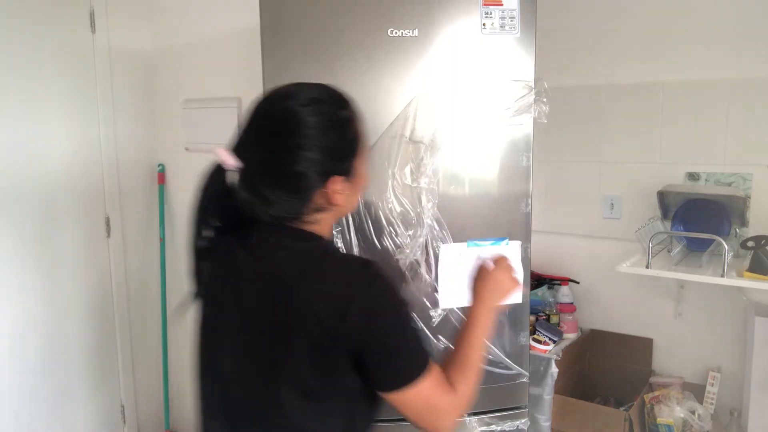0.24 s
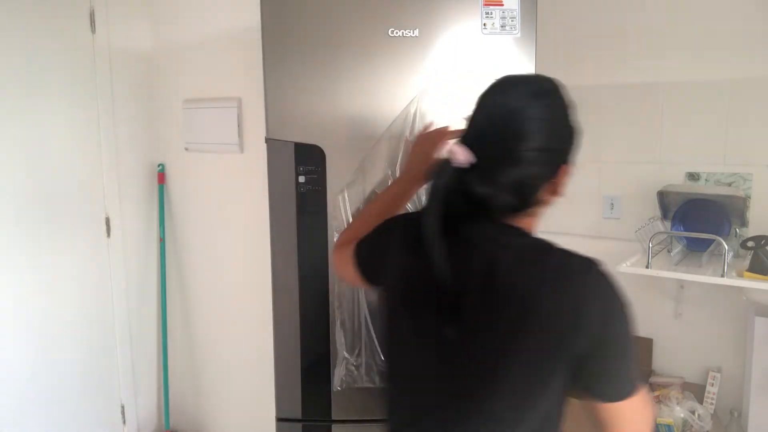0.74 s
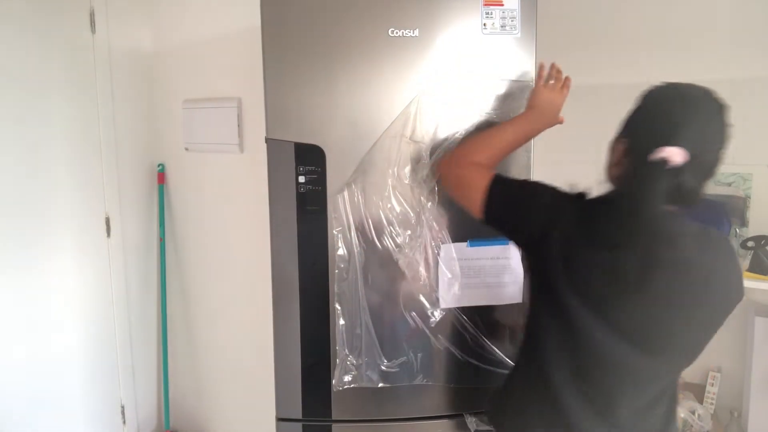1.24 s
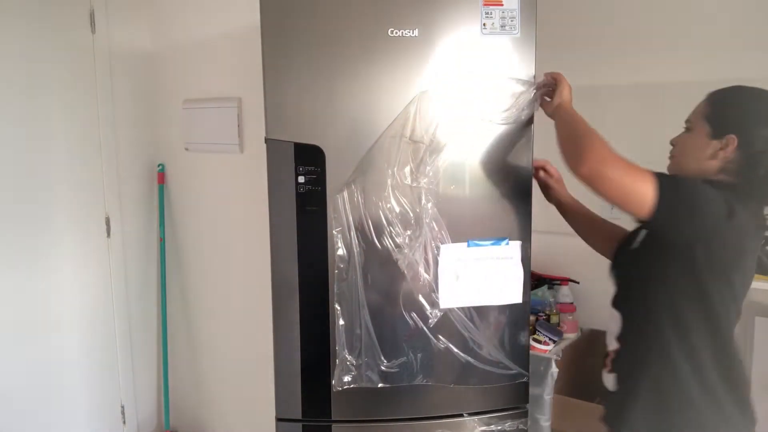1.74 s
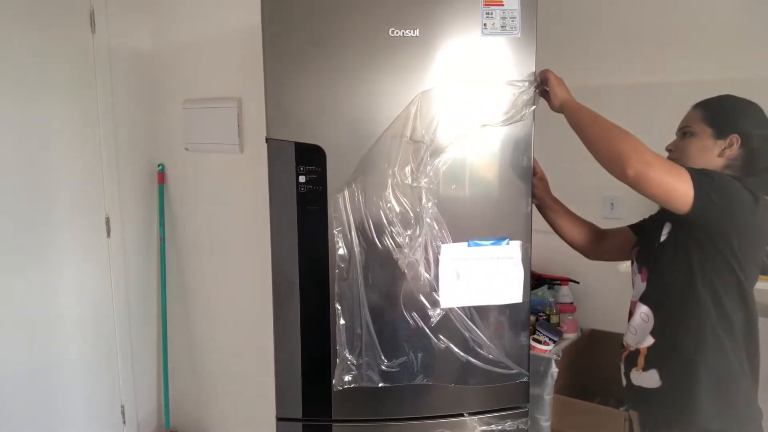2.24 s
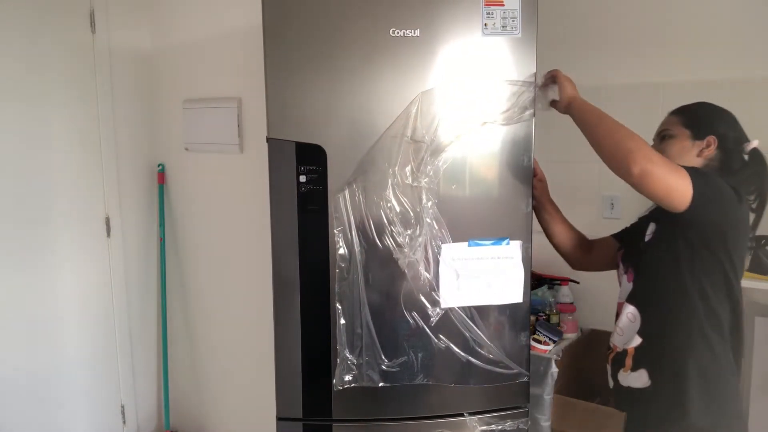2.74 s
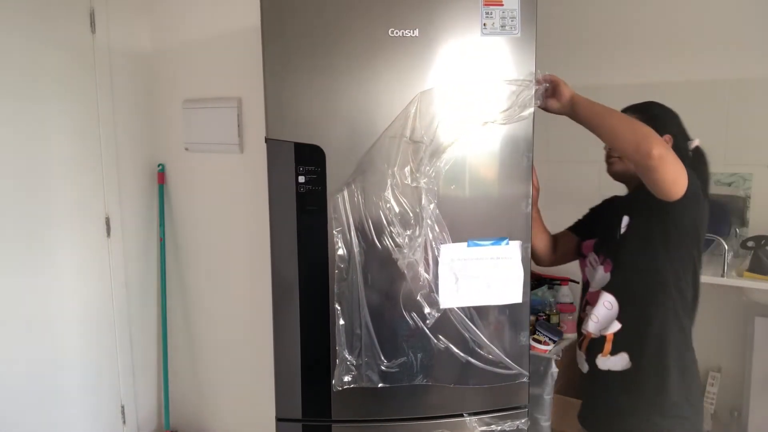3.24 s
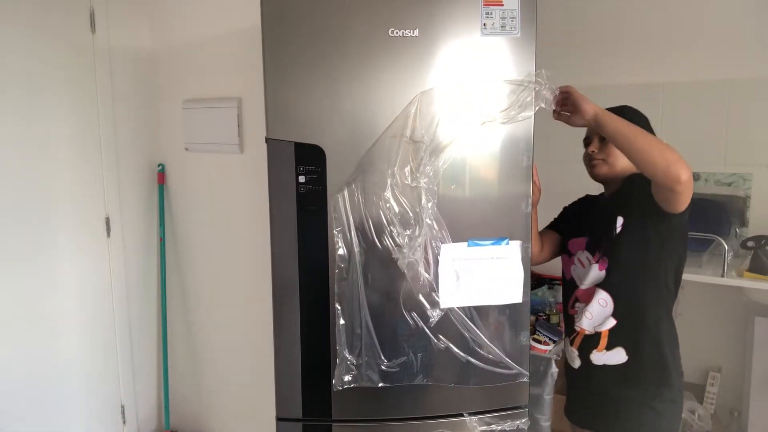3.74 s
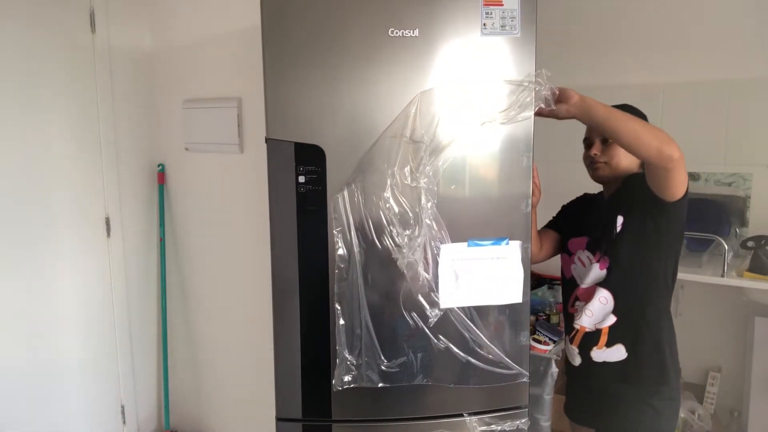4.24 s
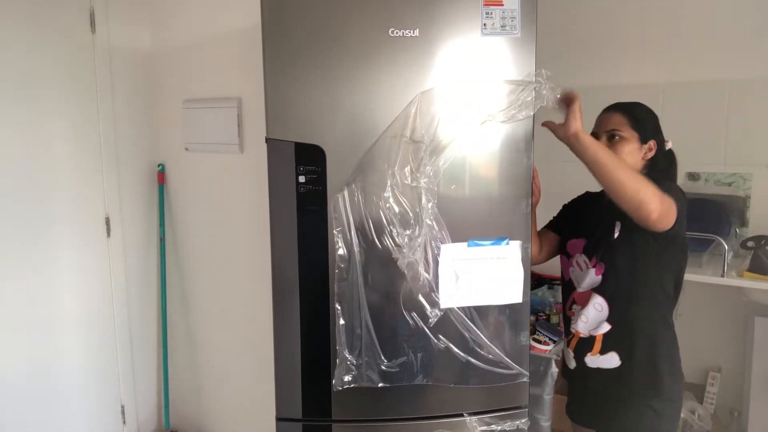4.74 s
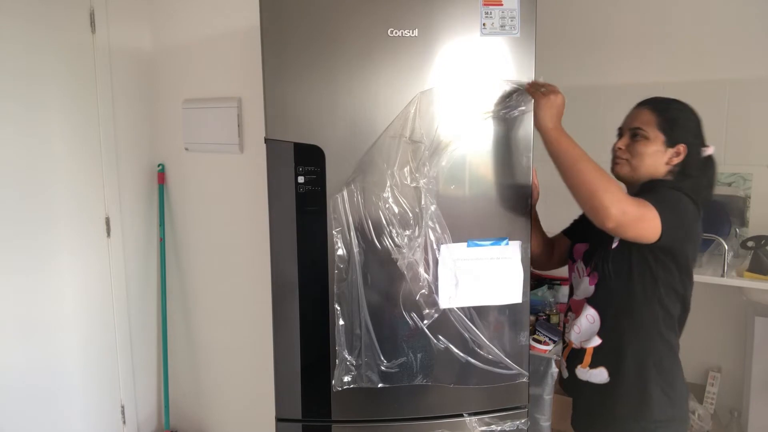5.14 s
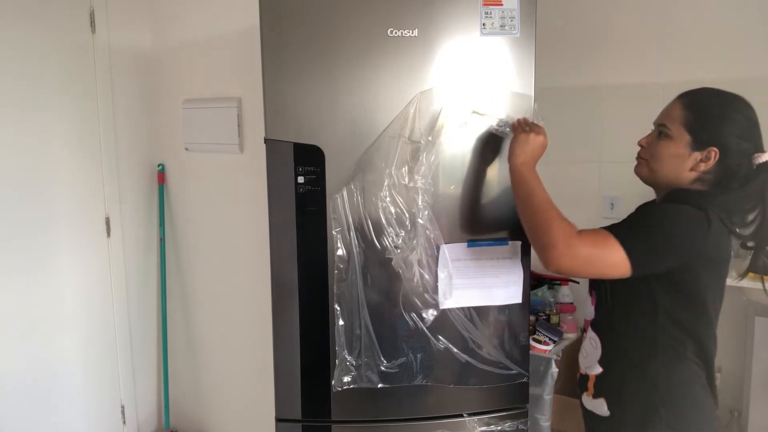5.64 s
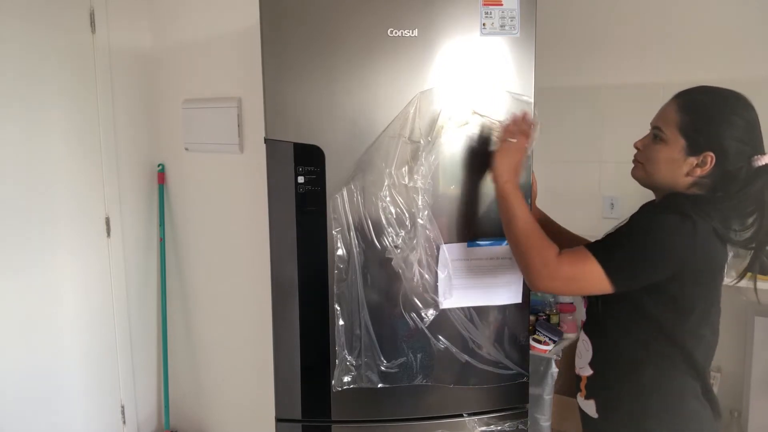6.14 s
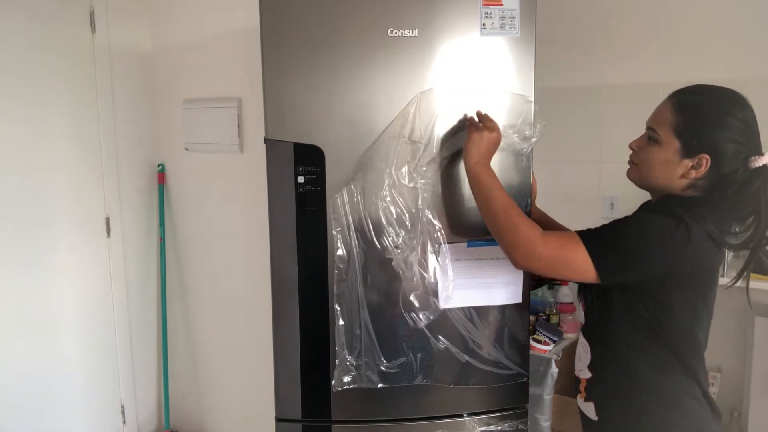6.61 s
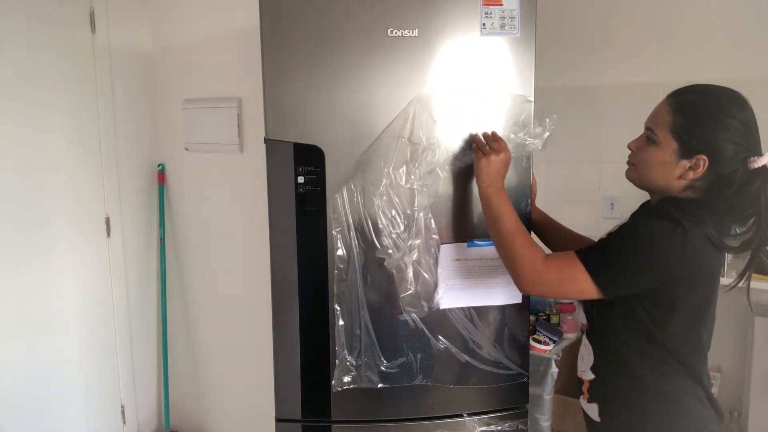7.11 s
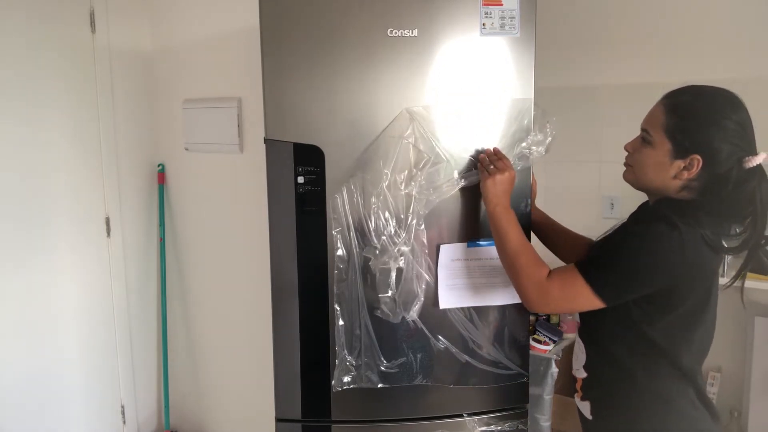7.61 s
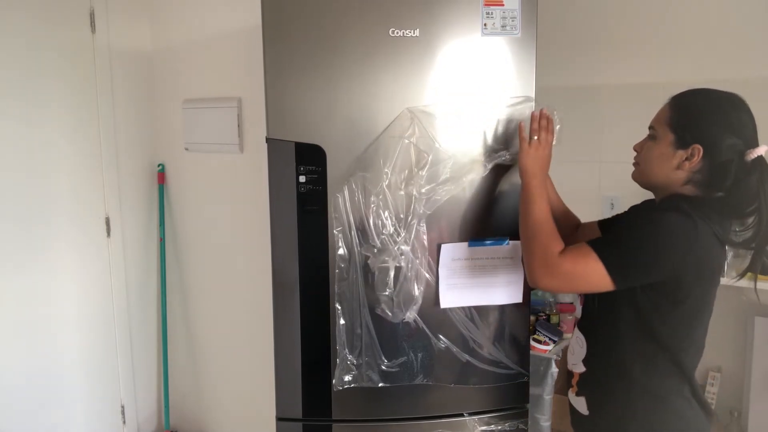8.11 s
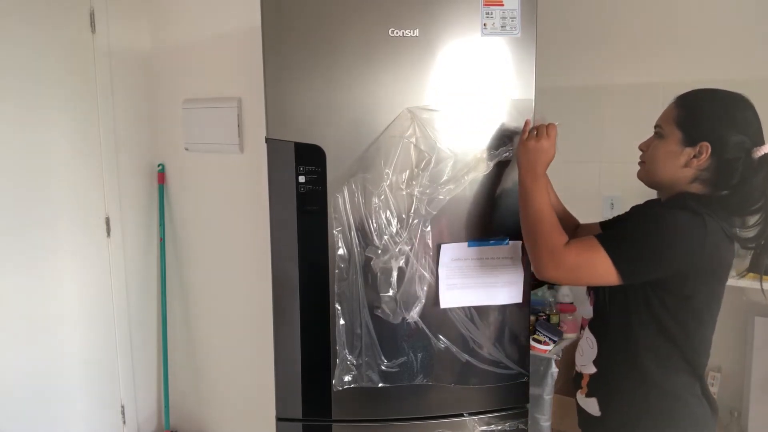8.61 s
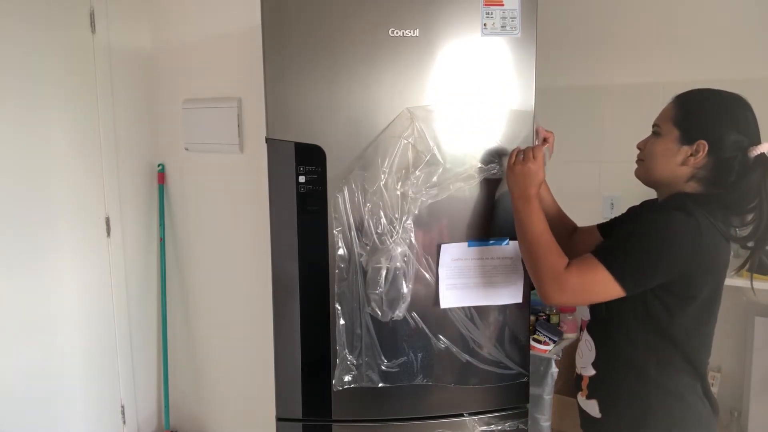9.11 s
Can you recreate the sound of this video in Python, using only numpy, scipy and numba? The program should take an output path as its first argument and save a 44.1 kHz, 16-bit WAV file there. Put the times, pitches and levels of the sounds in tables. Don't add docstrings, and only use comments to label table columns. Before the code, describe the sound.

Faint picking ticks grow into sharp crackling bursts as clingy plastic film is tugged off a fridge door, with dull bassy knocks.

```python
import sys
import numpy as np
from scipy import signal
from scipy.fft import rfft, irfft
from scipy.io import wavfile
from scipy.ndimage import uniform_filter1d
from numba import njit

SR = 44100
rng = np.random.default_rng(int(sys.argv[2]) if len(sys.argv) > 2 else 0)


def voltage_ratio(level):
    return 10 ** (np.asarray(level, float) / 20)


def to_wav(sig):
    pcm = np.clip(np.atleast_2d(sig), -1, 1) * 32767
    pcm = np.round(pcm).astype(np.int16)
    wavfile.write(sys.argv[1], SR, pcm.T)


N = 412776


def level(x, db):
    return x * voltage_ratio(db) / np.sqrt(np.mean(x ** 2))


def colour(x, points):
    hz, db = np.transpose(points)
    f = np.fft.rfftfreq(len(x), 1 / SR) + 1
    gain = voltage_ratio(np.interp(np.log(f), np.log(hz), db))
    return irfft(rfft(x) * gain, len(x))


def background():
    # freq_hz, density_db
    floor_spectrum = [(15, -67), (25, -11.5), (80, -13.5), (145, -13.5), (293, -18.5), (363, -20.5),
                      (394, -25), (463, -18), (516, -21.5), (560, -22), (677, -23), (7710, -42),
                      (16000, -47)]
    # freq_hz, width_hz, level_db
    hum_bands = [(40.7, 0.29, -59.5), (76.4, 8.5, -58)]
    steadiness = 0.3
    out = level(colour(rng.standard_normal(N), floor_spectrum), -62)
    f = np.fft.rfftfreq(N, 1 / SR)
    for hz, width_hz, db in hum_bands:
        band = np.exp(-((f - hz) / width_hz) ** 2)
        hum = irfft(rfft(rng.standard_normal(N)) * band, N)
        envelope = np.abs(signal.hilbert(hum))
        out = out + level(hum / envelope ** steadiness, db)
    return out


def room():
    # freq_hz, t60_s, level_db
    tail_bands = [(100, 0.66, -12), (235, 0.61, -6.5), (748, 0.55, -19), (2000, 0.59, -23.5),
                  (5170, 0.54, -19), (7300, 0.45, -20.5), (14000, 0.28, -15.5)]
    # delay_s, level_db
    first_echoes = [(.0022, -5), (.0052, -7), (.0075, -12), (.0112, -11)]
    build_s, early_s, early_boost = 0.00017, 0.0083, 0.43
    hz, t60_s, db = np.transpose(tail_bands)
    t = np.arange(2 ** 15) / SR
    octave = np.log2(np.fft.rfftfreq(len(t), 1 / SR) + 1)
    noise = rfft(rng.standard_normal(len(t)))
    tail = 0
    for centre in np.arange(5, 14.5, 0.5):
        band = irfft(noise * np.clip(1 - 2 * np.abs(octave - centre), 0, 1), len(t))
        band_db = np.interp(centre, np.log2(hz), db)
        band_t60_s = np.interp(centre, np.log2(hz), t60_s)
        tail = tail + band * voltage_ratio(band_db) * 1000 ** (-t / band_t60_s)
    tail = voltage_ratio(-9) * tail * (1 - np.exp(-t / build_s)) * (1 + early_boost * np.exp(-t / early_s))
    tail[0] = 1
    for k, (delay_s, echo_db) in enumerate(first_echoes):
        tail[int(delay_s * SR * rng.uniform(0.85, 1.15))] += (-1) ** k * voltage_ratio(echo_db)
    return tail


def kitchen(dry):
    spot = np.repeat(rng.integers(0, 4, N // 512 + 1), 512)[:N]
    out = 0
    for k in range(4):
        share = uniform_filter1d(1.0 * (spot == k), size=64)
        out = out + signal.oaconvolve(dry * share, room())[:N]
    return out


def thuds():
    # start_s, level_db, length_s
    soft_hits = [
        (1.5, -66, 0.18),
        (1.95, -71, .15),
        (2.962, -60, 0.17),
        (4.655, -52, 0.084),
        (5.034, -72, .08),
        (7.97, -59.5, 0.15),
    ]
    thud_hz = 176
    t = np.arange(N) / SR
    shape = 0
    for start_s, db, length_s in soft_hits:
        x = (t - start_s) / length_s
        shape = shape + voltage_ratio(db) * np.clip(x, 0, None) * np.exp(1 - 2 * np.abs(x)) * 2
    rub = colour(rng.standard_normal(N),
                 [(20, -50), (thud_hz / 2, -14), (thud_hz, 0), (thud_hz * 2, -9), (2000, -45)])
    return shape * level(rub, 0)


def ring(push, modes):
    t = np.arange(SR // 2) / SR
    response = sum(voltage_ratio(db) * np.sin(2 * np.pi * hz * t) * 1000 ** (-t / t60_s) for hz, db, t60_s in modes)
    return signal.fftconvolve(push, response)[:N]


def door_skin(push):
    # freq_hz, level_db, t60_s
    skin_modes = [(65, -31, 0.21), (101, -69, .2), (204, 0, 0.29), (296, -6.5, 0.13), (382, 5.5, 0.094),
                  (517, -10, 0.027), (576, 1, 0.11), (687, 2, 0.16), (792, 18.5, 0.045), (833, -40, 0.12),
                  (1070, -9, 0.055)]
    return ring(push, skin_modes)


def door_rocking():
    # start_s, level_db
    shoves = [
        (6.703, -41),
        (7.108, -20.5),
        (7.167, -51),
        (8.84, -26),
        (9.11, -33.5),
    ]
    # freq_hz, level_db, t60_s
    seal_modes = [(68, -16, 0.15), (98.9, -5.5, 1)]
    start_s, db = np.transpose(shoves)
    push = np.bincount((start_s * SR).astype(int), voltage_ratio(db - 20), N)
    return ring(push, seal_modes)


@njit
def grains(start, hz, cycles, size):
    out = np.zeros(N)
    for k in range(len(start)):
        p = np.exp((2j * np.pi - 1 / cycles[k]) * hz[k] / SR)
        z = size[k] + 0j
        for i in range(start[k], min(N, start[k] + int(7 * cycles[k] * SR / hz[k]))):
            z *= p
            out[i] += z.imag
    return out


def buckles(start_s, db, hz, tick_db, knock_db, ring_db, cycles):
    # time_s, pitch_hz, ring_db
    taut_sheet = [(1.5, 1360, 5.5), (2.45, 1510, -1.5), (2.6, 1250, 1), (3.42, 1490, 4), (3.55, 1430, 6.5),
                  (3.61, 830, 6.5), (4.14, 1620, -6.5), (4.4, 1360, -2), (5.2, 1220, 0), (5.55, 1260, 0),
                  (6.701, 1210, -4), (6.9, 1105, -3.5), (7.17, 1000, 1.5), (8.9, 1136, -1.5),
                  (9.15, 1300, 0.7)]
    taut_cycles, tick_cycles = 1.7, 0.6
    count = len(start_s)
    start = np.clip((start_s * SR).astype(np.int64), 0, N - 1)
    chance = rng.random((count, 3)).T
    size = np.sign(chance[0] - 0.5) * voltage_ratio(db)
    crease = grains(start, np.clip(hz, 400, 15000), cycles * np.ones(count), size)
    tick_hz = 6500 * 1.53 ** chance[1]
    tick = grains(start, tick_hz, np.full(count, tick_cycles), -size * voltage_ratio(tick_db + 6.5))
    time_s, pitch_hz, stretch_db = np.transpose(taut_sheet)
    taut_hz = np.interp(start_s, time_s, pitch_hz) * (0.92 + 0.16 * chance[2])
    taut_db = ring_db + np.interp(start_s, time_s, stretch_db)
    taut = grains(start, taut_hz, np.full(count, taut_cycles), -size * voltage_ratio(taut_db))
    push = np.bincount(start, size * voltage_ratio(knock_db), N)
    return crease + tick + taut, push


def crackle():
    # peak_s, crackle_db, rise_s, fall_s, sheet_pitch_hz
    pulls = [(0.001, -53, .02, 0.076, 1820), (.97, -51.5, 0.17, 0.11, 2700),
             (1.19, -65.5, 0.18, 0.08, 4540), (1.64, -51.5, .02, 0.6, 2150), (2.024, -48, 0.22, 0.33, 2830),
             (2.72, -44, 0.1, 0.11, 1720), (3.21, -43.5, 0.053, 0.2, 2000),
             (3.35, -38.5, 0.034, 0.12, 2330), (3.434, -27.5, 0.03, 0.31, 2500),
             (3.561, -21.5, 0.17, 0.086, 2050), (4.392, -28, .1, 0.11, 1970),
             (4.698, -48.5, 0.16, 0.04, 2000), (5.11, -46.5, 0.16, .05, 2780),
             (5.241, -30, 0.17, 0.067, 2260), (5.49, -23, 0.055, 0.092, 1480),
             (5.86, -51.5, 0.77, 0.045, 1800), (6.091, -40, 0.057, .05, 2560),
             (6.538, -34.5, 0.21, 0.0089, 2400), (7.6, -56.5, 0.25, 0.19, 2300),
             (7.749, -44, 0.073, 0.19, 2000), (8.08, -55.5, .06, 0.54, 2210),
             (8.3, -47.5, 0.17, 0.99, 2460), (8.62, -62, 0.17, .25, 2800), (9.13, -27, 0.037, 0.16, 1580)]
    flips_per_s, lowest_flip_hz, pull_rounding = 2500, 1030, 1.306
    patch_s, patch_db, patch_octaves = 0.012, 1.5, 0.46
    s = np.sort(rng.uniform(0, N / SR, int(flips_per_s * N / SR)))
    count = len(s)
    peak_s, peak_db, rise_s, fall_s, sheet_hz = np.transpose(pulls)[:, :, None]
    span_s = np.where(s < peak_s, rise_s, fall_s)
    slack_db = 20 * (np.abs(s - peak_s) / span_s) ** pull_rounding
    pull_db = peak_db - slack_db
    strongest = np.argmax(pull_db, axis=0)
    each = np.arange(count)
    db = pull_db[strongest, each]
    hz = sheet_hz[strongest, 0]
    slack_db = np.minimum(slack_db[strongest, each], 25)
    uneven_db = 3.5 + 0.054 * np.clip(-36 - db, 0, 30)
    patch = rng.standard_normal((2000, 2))[(s / patch_s).astype(int)].T
    db = db + patch_db * patch[0]
    hz = hz * 2 ** (patch_octaves * patch[1])
    db = db + 2.5 + uneven_db * (np.minimum(rng.exponential(size=count), 4) - 2.5)
    hz = np.maximum(hz * 2 ** (0.25 + 0.68 * rng.standard_normal(count)), lowest_flip_hz)
    tick_db = -3.5 - 0.17 * slack_db
    knock_db = -12.5 + 0.2 * slack_db
    return buckles(s, db, hz, tick_db, knock_db, ring_db=-11.5, cycles=1.9)


def snaps():
    # start_s, peak_db, pitch_hz
    small_creases = [(0.206, -45, 7900), (0.878, -44, 1790), (1.43, -41.5, 2380), (1.499, -39.5, 2330),
                     (1.569, -48, 2500), (1.641, -39.5, 3200), (1.721, -40, 2680), (1.766, -44, 2400),
                     (1.778, -34.5, 2200), (1.906, -40.5, 3180), (1.913, -37, 2640), (1.923, -40.5, 3130),
                     (1.981, -44, 3800), (2, -34, 3900), (2.147, -41, 3160), (2.263, -46, 2220),
                     (2.38, -32, 3550), (2.699, -27, 5160), (2.941, -45, 5100), (3.035, -41, 3860),
                     (3.047, -37.5, 5940), (2.82, -47, 9000), (3.133, -42, 3320), (3.164, -37.5, 1670),
                     (3.209, -27.5, 2040), (3.328, -34, 4100),
                     (4.273, -32, 2000), (4.295, -32, 2500), (4.333, -25.5, 3200), (4.686, -42, 2760),
                (4.957, -40, 4370), (5.015, -33.5, 2470), (5.031, -32, 2670), (5.046, -35, 2580),
                (5.089, -38, 3600), (5.105, -34, 3500), (6.038, -31, 3450), (6.061, -26, 2650),
                (6.092, -24, 4800), (6.288, -38.5, 3600), (6.332, -38.5, 1810), (6.372, -39, 3000),
                (6.407, -30, 4870),
                     (7.472, -38, 6500), (7.546, -36, 2880), (7.573, -31, 4630), (7.658, -31, 1940),
                (7.682, -38, 3860), (7.694, -33.5, 4700), (7.712, -35, 2500), (7.748, -28.5, 1460),
                (7.773, -31, 4030), (7.782, -35, 2500), (7.917, -35.5, 3380), (8.004, -41, 4000),
                (8.062, -32.5, 3130), (8.064, -46, 8900), (8.087, -37, 4100), (8.12, -39, 2570),
                (8.188, -38.5, 3000), (8.254, -25.5, 4200), (8.318, -32.5, 3560), (8.36, -32, 3200),
                (8.492, -36, 4030), (8.514, -35, 2900), (8.574, -35, 3140), (8.645, -73, 3130),
                (8.727, -38, 4200), (8.817, -41, 2670)]
    # start_s, peak_db, pitch_hz
    taps = [(1.678, -32.5, 3060), (1.802, -32, 2570), (3.184, -34.5, 1840), (4.064, -47, 1880),
            (4.14, -22.5, 1950), (4.579, -37, 1930), (4.996, -36.5, 2560), (5.918, -28.5, 3770),
            (6.231, -47, 3200), (7.941, -34, 2210), (8.179, -36, 2100)]
    # start_s, peak_db,
    # pitch_hz, knock_db
    wide_creases = [(2.445, -14.5, 2330, 4), (2.506, -14.5, 2670, 3), (2.572, -14, 1700, 1.5),
                    (2.709, -19.5, 2620, -10), (3.339, -20, 2560, -9), (3.416, -22.5, 1800, 5),
                    (3.426, -19, 2300, 3.5), (4.347, -16, 2720, -7), (4.366, -16, 2800, 3.5),
                    (4.382, -17.5, 2300, 4), (4.399, -18.5, 2400, 14.5), (4.436, -14.5, 2000, 8.5),
                    (5.129, -20, 2900, -10), (5.165, -17.5, 2640, -6), (5.212, -12.5, 3500, -11),
                    (5.251, -18.5, 2370, 2), (5.371, -10, 2170, 4.5), (5.433, -6, 2600, 0),
                    (5.451, -21, 2300, 1), (5.468, -5.5, 2860, -13), (5.486, -14.5, 2740, 4.5),
                    (5.496, -30, 2400, -10), (5.506, -6.5, 2420, -8), (5.523, -9, 2700, 6),
                    (5.532, -9, 2670, -1), (5.547, -8, 2530, 4), (5.567, -5, 2900, -4.5),
                    (5.576, -13.5, 2000, -4),
                    (5.901, -14, 3900, -30), (6.099, -24.5, 3380, -17), (6.478, -16, 4230, -3),
                   (6.491, -16.5, 3200, -4), (6.527, -9.5, 2980, -1), (6.676, -4, 2800, 3),
                   (6.706, -5, 3000, 0), (6.876, -2, 3080, 0), (7.108, -1.5, 2640, -4.8),
                   (7.149, -0.5, 2300, -7), (7.18, -1, 2300, -10), (7.198, -2.5, 1830, -22),
                   (7.833, -21.5, 2660, -7.5), (8.375, -19.5, 3560, -27), (8.831, -6.5, 2310, -0.5),
                   (8.856, -7.5, 3720, 0.5), (8.88, -6, 1540, -32), (8.906, -7, 2310, -2.5),
                   (8.948, -6.5, 2170, -3.5), (9.078, -9.5, 2700, -0.5), (9.108, -9, 2400, 4),
                   (9.143, -7, 2200, -7), (9.15, -16, 2470, -18), (9.163, -6.5, 2400, -1),
                   (9.183, -6.5, 2270, -34)]
    wide_tick_db, small_tick_db, tap_tick_db, tick_db_per_octave = -8.5, -6, -27, 2.5
    small_knock_db, small_ring_db = -10.5, -22.5
    wide_cycles, small_cycles = 0.39, 0.9
    flips, spray_octaves = 8, 4.0

    wide = np.array(wide_creases)
    ones = np.ones(len(wide))
    wide_ring_db = -17.5 + 0.39 * wide[:, 3]
    wide = np.c_[wide, wide_tick_db * ones, wide_ring_db, wide_cycles * ones]
    small = np.vstack([small_creases, taps])
    settings = [small_knock_db, small_tick_db, small_ring_db, small_cycles]
    small = np.c_[small, np.tile(settings, (len(small), 1))]
    small[-len(taps):, 4] = tap_tick_db

    s, db, hz, knock_db, tick_db, ring_db, cycles = np.repeat(np.r_[wide, small], flips, axis=0).T
    tick_db = tick_db + tick_db_per_octave * np.log2(hz / 2500)
    chance = rng.random((len(s), 3)).T
    later = np.arange(len(s)) % flips > 0
    s = s + 0.0004 + later * (0.005 * chance[0] - 0.0007)
    db = db - later * (14.4 + 8 * chance[1])
    hz = hz * 2 ** (later * spray_octaves * (chance[2] - 0.5))
    return buckles(s, db, hz, tick_db, knock_db, ring_db + 8, cycles)


def scene():
    rustle, rustle_push = crackle()
    snap, snap_push = snaps()
    high_pass = signal.butter(2, 480, "high", fs=SR, output="sos")
    film = signal.sosfilt(high_pass, voltage_ratio(2.5) * snap + voltage_ratio(-1.53) * rustle)
    door = door_skin(voltage_ratio(-47) * snap_push + voltage_ratio(-35.5) * rustle_push) + door_rocking()
    return (kitchen(film + door) + background() + thuds())[None]


def band_limit(x):
    return signal.sosfilt(signal.butter(12, 16980, fs=SR, output="sos"), x)


def record(dry):
    # freq_hz, gain_db
    mic_response = [(20, -36), (36, -16), (100, -5), (400, 0.5), (1200, -3.5), (4000, 1), (7500, 1.5),
                    (9000, -3), (15600, 2), (16200, -43)]
    mix = colour(dry[0], mic_response)[None]
    return band_limit(mix)


dry = scene()
out = record(dry)
to_wav(out)
```